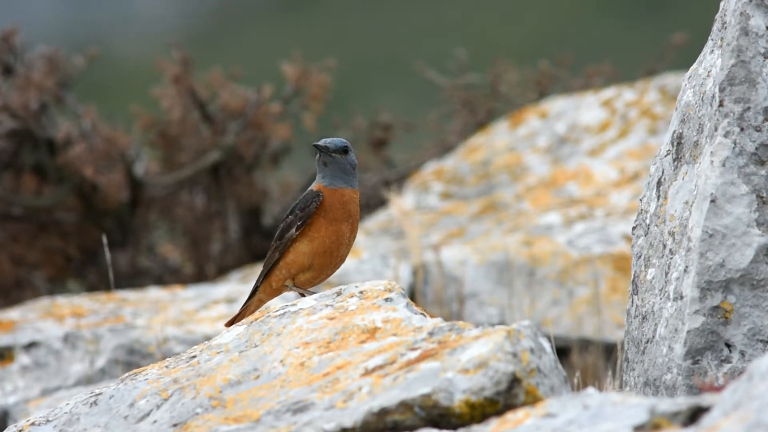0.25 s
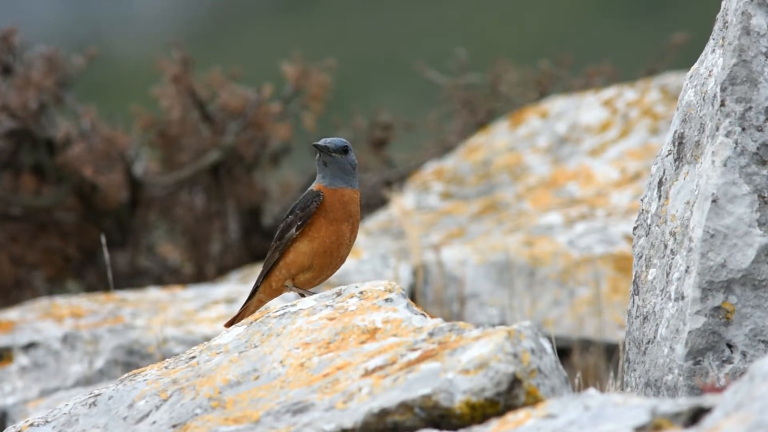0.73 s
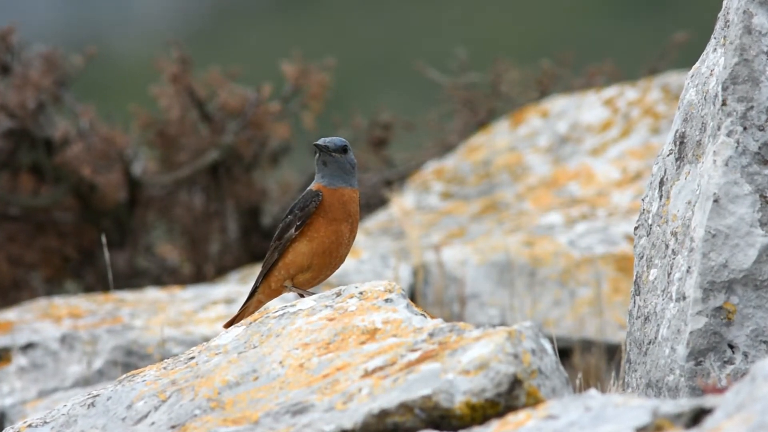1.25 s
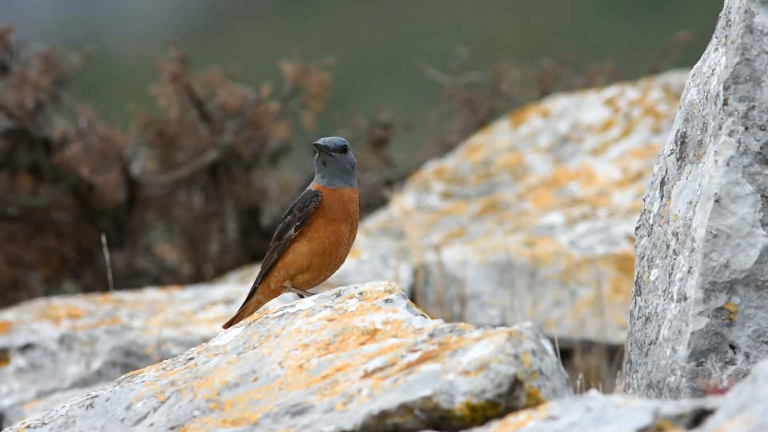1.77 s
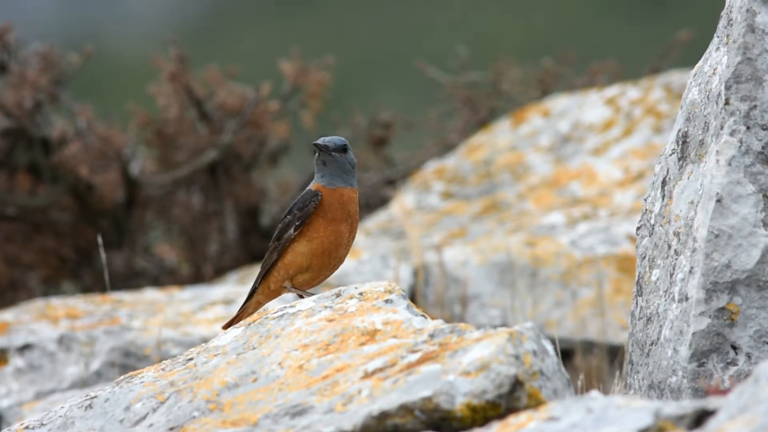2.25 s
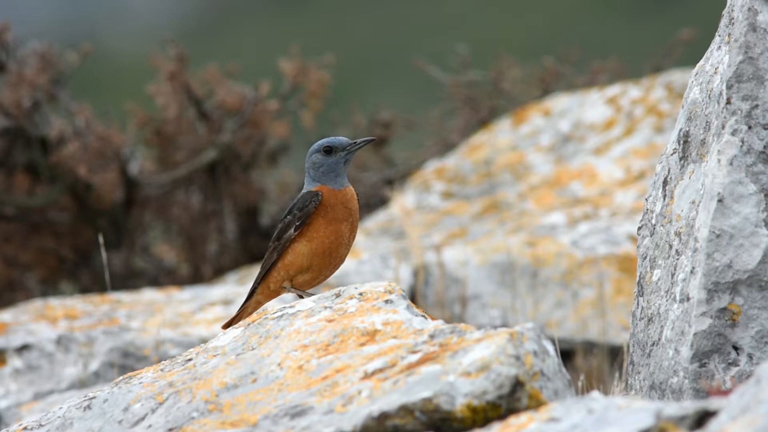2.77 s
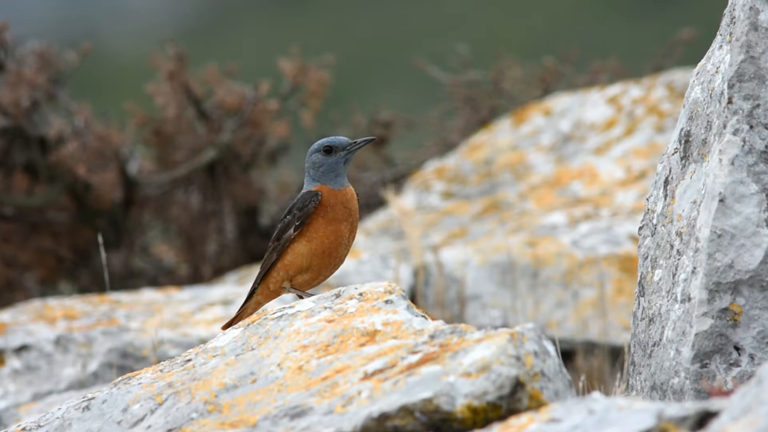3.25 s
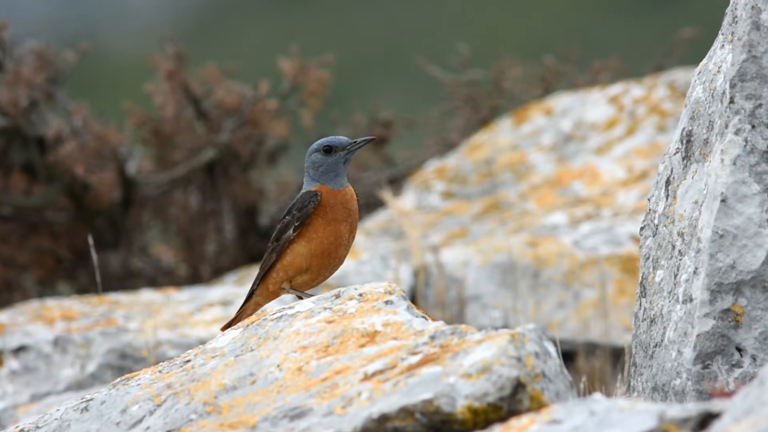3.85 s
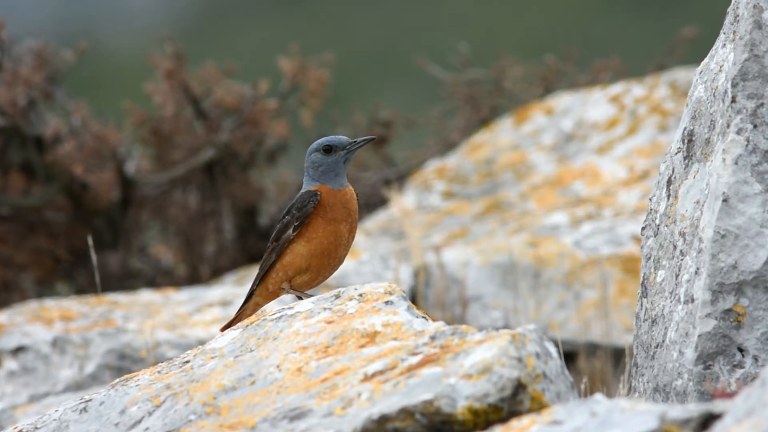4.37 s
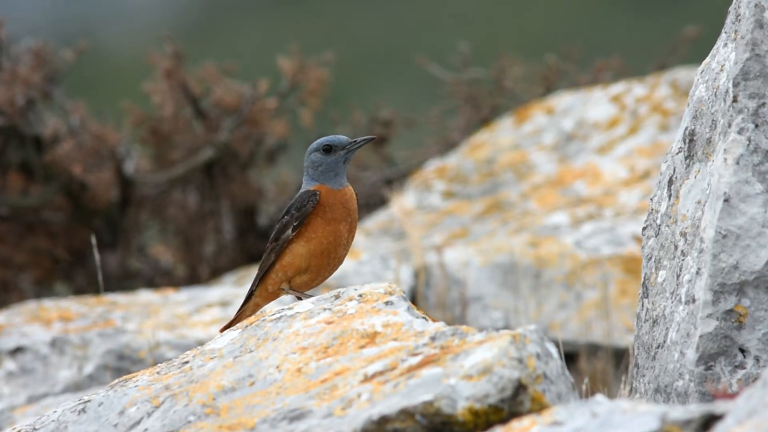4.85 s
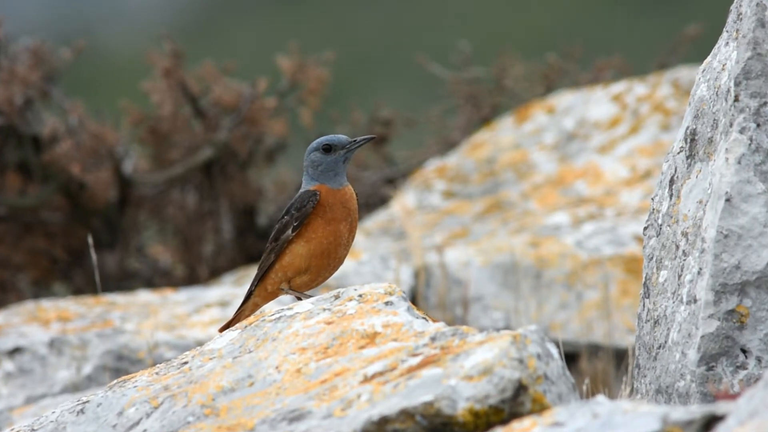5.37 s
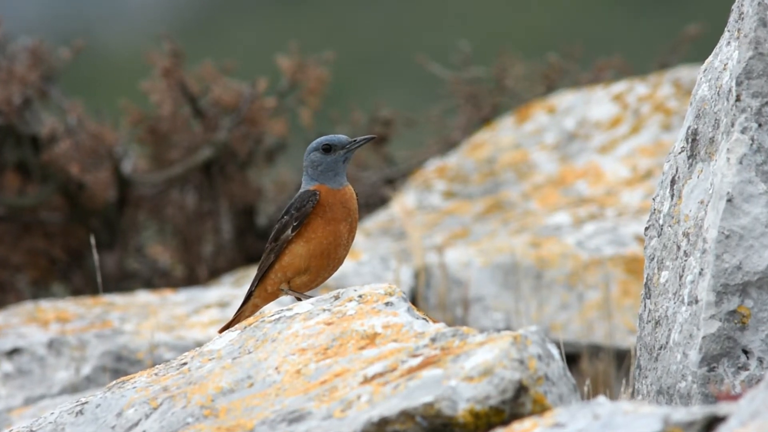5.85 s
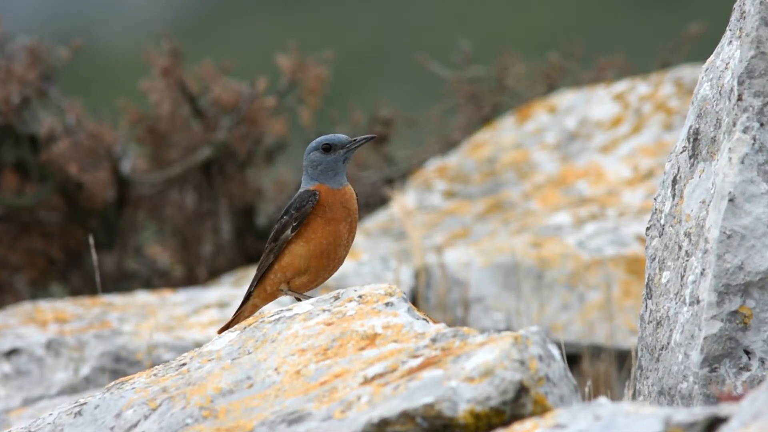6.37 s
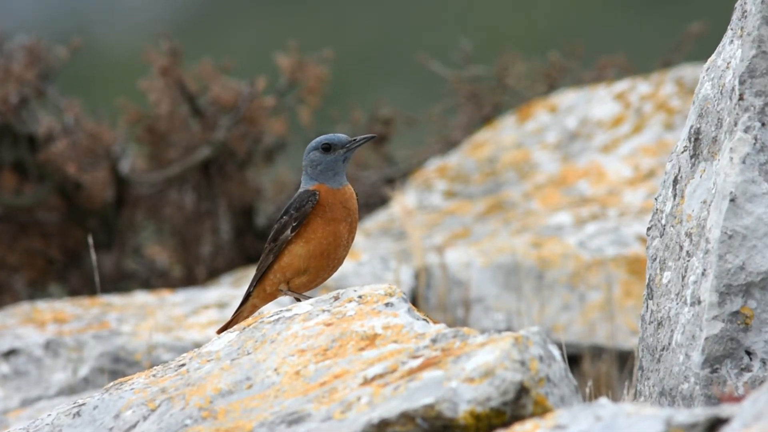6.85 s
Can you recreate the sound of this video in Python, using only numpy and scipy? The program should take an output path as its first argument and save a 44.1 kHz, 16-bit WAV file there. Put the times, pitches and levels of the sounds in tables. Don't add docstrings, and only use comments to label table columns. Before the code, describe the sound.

Outdoors on a rocky slope, low far traffic rumble and soft breezy hiss run throughout, with a faint cricket early on. After about a second and a half a rock thrush begins softly, then pours out clear whistles, purrs, rattles and high shakes, ending on a pulsing note. Nearby stone adds short, tight echoes. The handheld stereo microphone picks up small ticks and dull thuds, then only background remains.

```python
import sys
import numpy as np
from scipy import signal
from scipy.io import wavfile
from scipy.ndimage import uniform_filter1d

SR = 44100
rng = np.random.default_rng(int(sys.argv[2]) if len(sys.argv) > 2 else 0)


def gain_from_decibels(decibels):
    exponent = np.asarray(decibels, float) / 20
    return 10 ** exponent


def waveform_to_disk(signal):
    frames = np.transpose(np.atleast_2d(signal))
    scaled = np.clip(frames, -1, 1) * 32767
    samples = np.round(scaled).astype(np.int16)
    wavfile.write(sys.argv[1], SR, samples)


N = 313900


def at_hz(points, hz):
    point_hz, level_db = np.transpose(points)
    return np.interp(np.log(hz), np.log(point_hz), level_db)


def in_time(rows, t):
    s, *columns = np.transpose(rows)
    return [np.interp(t, s, c) for c in columns]


def curved(rows, t):
    s, hz = np.transpose(rows)[:2]
    rise = np.diff(hz) / np.diff(s)
    before, after = np.r_[rise[0], rise], np.r_[rise, rise[-1]]
    slope = np.where(before * after > 0, 2 * before * after / (before + after + 1e-9), 0)
    k = np.clip(np.searchsorted(s, t) - 1, 0, len(s) - 2)
    span = s[k + 1] - s[k]
    u = np.clip((t - s[k]) / span, 0, 1)
    step = (hz[k + 1] - hz[k]) * u * u * (3 - 2 * u)
    bend = span * u * (1 - u) * ((1 - u) * slope[k] - u * slope[k + 1])
    return hz[k] + step + bend


def rms_one(x):
    return x / np.sqrt(np.mean(x ** 2) + 1e-20)


def resonance(x, hz, width_hz):
    r = np.exp(-np.pi * width_hz / SR)
    poles = [1, -2 * r * np.cos(2 * np.pi * hz / SR), r * r]
    return signal.lfilter([(1 - r * r) / 2, 0, (r * r - 1) / 2], poles, x + 1e-18)


def drift(rate):
    r = np.exp(-80 * np.pi * rate / SR)
    white = rng.standard_normal(N // 40 + 2002)
    slow = signal.lfilter([1], [1, -2 * r, r * r], white)[2000:]
    return np.interp(np.arange(N) / 40, np.arange(len(slow)), rms_one(slow))


def swells(rows):
    t = np.arange(N) / SR
    return sum(gain_from_decibels(level_db) * np.exp(-((t - s) / half) ** 2) for s, half, level_db in rows)


def add(out, piece, s):
    i = round(s * SR)
    out[i:i + len(piece)] += piece


# frequency in Hz, likeness from 0 to 1.
LIKENESS = [(95, 1.0), (150, 0.9992), (290, 1), (640, 0.83), (1410, 0.18), (3100, 0.1), (6820, 0.04),
            (15000, 0.015)]


def banded_noise(spectrum, patchy_db):
    lowest, highest = spectrum[0][0], spectrum[-1][0]
    edges = lowest * 2 ** np.arange(0, np.log2(highest / lowest) + .3, 1 / 3)
    white = rng.standard_normal((2, 2, N))
    out = 0
    for k, (low, high) in enumerate(zip(edges, edges[1:])):
        band = signal.butter(2, [low, high], "band", fs=SR, output="sos")
        mid, side = signal.sosfilt(band, white[k % 2])
        hz = np.sqrt(low * high)
        alike = np.clip(at_hz(LIKENESS, hz), 0, 1 - 2.5e-5)
        gain = gain_from_decibels(at_hz(spectrum, hz) + patchy_db * drift(5.6))
        out = out + gain * (np.sqrt(1 + alike) * mid + np.sqrt(1 - alike) * side * [[1], [-1]])
    return rms_one(out)


# time in seconds, level in dB.
TRAFFIC = [(0, -46), (.8, -48), (3.1, -47.5), (4.2, -46), (5.5, -46.5), (6.2, -45), (7.12, -45.5)]
# frequency in Hz, density in dB per Hz.
RUMBLE = [(20, -14.5), (57, -2), (75, 1.5), (118, -8), (189, -14.5), (270, -22), (600, -27.5), (780, -60)]


def traffic():
    level_db = in_time(TRAFFIC, np.arange(N) / SR)[0] + 0.73 * drift(6.7)
    return gain_from_decibels(level_db + 0.54) * banded_noise(RUMBLE, patchy_db=1.5)


# middle in seconds, half length in seconds, level in dB.
MOTOR = [(.2, 0.043, -63), (.7, 0.23, -47.5), (1.3, 0.28, -53.5), (2.6, 0.13, -65), (3.65, 0.11, -48.5),
         (4.55, 0.39, -53), (5.25, 0.14, -47.5), (6.05, 0.028, -52), (6.6, 0.082, -57)]


def motor():
    start_hz, rise_hz_per_s, drone_db = 187.7, 2.2, -61.5
    hz = start_hz + rise_hz_per_s * np.arange(N) / SR + 3 * drift(1.71)
    gain = gain_from_decibels(-4.0) * (gain_from_decibels(drone_db) + swells(MOTOR))
    return gain * np.sin(2 * np.pi * np.cumsum(hz) / SR)


# frequency in Hz, width in Hz, level in dB.
WHINES = [
    (1108, 24, -71),
    (1372, 82, -65.5),
    (1631, 27, -71.5),
]


def whines():
    common, own = rng.standard_normal(N), rng.standard_normal((2, N))
    noise = common + 0.31 * own
    return sum(gain_from_decibels(level_db) * rms_one(resonance(noise, hz, width_hz)) for hz, width_hz, level_db in WHINES)


# time in seconds, level in dB.
HISS_DB = [(0, -56.5), (2, -55), (5, -54.5), (7.12, -55.5)]
# frequency in Hz, density in dB per Hz.
HISS = [(240, -30), (400, -10), (900, -3.5), (1250, -4.5), (1700, -4), (5510, -8.5), (11300, -15.5),
        (16500, -21)]


def hiss():
    return gain_from_decibels(in_time(HISS_DB, np.arange(N) / SR)[0]) * banded_noise(HISS, patchy_db=1.0)


# time in seconds, level in dB.
CRICKET = [(0, -65), (1.85, -71), (2.1, -67), (3.5, -76), (7.12, -90)]


def cricket():
    pitch_hz, first_s, every_s = 5440, 0.076, 0.13
    t = np.arange(N) / SR
    beat = ((t - first_s) / every_s + .5) % 1 - .5
    rough = rms_one(resonance(rng.standard_normal((2, N)), pitch_hz, 60))
    tone = np.sin(2 * np.pi * pitch_hz * t) + 0.69 * rough
    level = gain_from_decibels(in_time(CRICKET, t)[0] + 1.3 * drift(4.2))
    return level * np.exp(-(beat / .17) ** 2) * tone


# time in seconds, level in dB.
KNOCKS = [
    (.235, -39.5),
    (1.517, -34.5),
    (2.024, -41),
    (4.39, -36),
]
# start in seconds, peak in dB, brightness in dB, length in seconds.
TICKS = [(3.154, -31.5, -4, 0.0056), (3.162, -38.5, -8, 0.011), (3.178, -42, -6, 0.0061),
         (3.189, -33, -15, 0.014), (3.198, -35, -5, 0.0064), (3.207, -42, -2, 0.0059),
         (3.226, -29, -17, 0.0066), (3.232, -37, -0.5, 0.008), (3.25, -43, -8, 0.01),
         (3.264, -39, -10, 0.006), (3.266, -45, 4, 0.0099), (3.29, -50, -6, 0.008)]
# frequency in Hz, width in Hz, level in dB.
CASING = [(423, 160, -13.5), (596, 67, -4.5), (720, 87, 1), (1034, 58, 6.5), (1200, 144, 1),
          (1720, 145, 3.5), (3000, 870, -7.5)]


def ticks():
    rasp, bright = np.zeros((2, N))
    t = np.arange(round(.04 * SR)) / SR
    for (s, level_db, bright_db, length), noise in zip(TICKS, rng.standard_normal((len(TICKS), len(t)))):
        burst = gain_from_decibels(level_db) * noise * t / length * np.exp(1 - 2 * t / length)
        add(rasp, burst, s - .002)
        add(bright, gain_from_decibels(bright_db) * burst, s - .002)
    for s, level_db in KNOCKS:
        add(rasp, .4 * gain_from_decibels(level_db) * np.hanning(20), s - .003)
        add(rasp, .7 * gain_from_decibels(level_db) * np.hanning(26), s + .002)
    rung = 0
    for k, (hz, width_hz, level_db) in enumerate(CASING):
        rung = rung + (-1) ** k * gain_from_decibels(level_db + 12.5) * resonance(rasp, hz, width_hz)
    scrape = resonance(resonance(resonance(bright, 3900, 2600), 3800, 4300), 3500, 5000)
    return (rung + scrape) * gain_from_decibels(np.array([[-.6], [.6]]))


# time in seconds, peak in dB.
THUDS = [
    (0.284, -39.5),
    (0.417, -44.5),
    (0.498, -41.5),
    (1.039, -46),
    (3.785, -38),
    (4.176, -53),
    (5.95, -47.5),
]


def thuds():
    push = np.zeros(N)
    for s, level_db in THUDS:
        add(push, gain_from_decibels(level_db + 16.5) * np.hanning(60), s)
    return resonance(push, hz=341, width_hz=45)


# time in seconds, cycles done.
PACE = [
    [(2.045, 0), (2.312, 62)],
    [(2.354, .22), (2.44, 3.25), (2.46, 3.9)],
    [(2.704, -.6), (2.765, 5.8), (2.85, 14.8)],
    [(4.66, 0), (4.805, 20)],
    [(5.058, -4.3), (5.122, .15), (5.164, 3.1), (5.208, 6.05), (5.24, 8.02), (5.269, 10.02), (5.31, 13.01),
     (5.39, 19.01), (5.442, 22.95)],
    [(4.09, 0), (4.32, 30)],
]
# time in seconds, pitch swing in Hz, level swing in dB, unsteadiness in Hz.
VIBRATO = [
    [(2.045, 60, 2.5, 58), (2.09, 120, -1, 80), (2.2, 100, -0.5, 80.7), (2.312, 40.3, 3.5, 40)],
    [(2.354, 264, 1.5, 10), (2.435, 160, 0, 8), (2.452, 3.8, -2.5, 5)],
    [(2.704, 180, 5, 40), (2.76, 170, 4, 25), (2.8, 80, -2.5, 42), (2.85, 30, 12.5, 15)],
    [(4.66, 30, 4, 16), (4.72, 69.5, -1.5, 19), (4.805, 60.7, 1, 15)],
    [(5.058, 18, -6, 12), (5.122, 120, 10, 23), (5.18, 160, 2.5, 16), (5.225, 120, 6, 18),
     (5.269, 100, 9.5, 25), (5.31, 63, 5, 25), (5.36, 36, 7.5, 16), (5.4, 35, 10.5, 17),
     (5.442, 50, 10, 16)],
    [(4.09, 15, 2.5, 35), (4.2, 15, 1.5, 35), (4.32, 15, 2.5, 40)],
]
# whistle pitch in Hz, octave against the whistle in dB.
OVERTONE = [(1650, -2), (2050, -21), (2300, -37), (2500, -20.5), (2700, -19), (3000, -27.5), (4300, -27.5)]
# time in seconds, change in dB.
BEAK = [
    [(.05, 1.5), (1.3, -20), (1.46, -20), (1.55, -6), (2.19, 5), (2.36, -2), (2.47, -4), (2.545, -2),
     (2.66, 2.5), (3.1, 8), (3.18, 3), (3.22, 4), (3.3, -5), (3.48, -2), (3.55, 2)],
    [(3.6, .1), (3.74, -6), (4.008, -17), (4.022, 5.5), (4.045, -7), (4.1, -4), (4.13, 3), (4.16, -9),
     (4.22, 3), (4.28, 0), (4.32, -5), (4.6, 3), (4.63, -1), (4.7, 0), (4.8, -4), (4.9, -2), (5.45, -2)],
]


def whistle(rows, glide_s=.004, fade_s=.005, shaky=.002):
    t = np.arange(rows[0][0], rows[-1][0] + fade_s, 1 / SR)
    hz = curved(rows, t)
    level_db = uniform_filter1d(in_time(rows, t)[1], max(1, round(glide_s * SR)), mode="nearest")
    tremor = rms_one(resonance(rng.standard_normal(SR // 2), 160, 250))[:len(t)]
    for pace, shake in zip(PACE, VIBRATO):
        turn = 2 * np.pi * in_time(pace, t)[0]
        swing_hz, swing_db, unsteady_hz = in_time(shake, t)
        on = (t >= shake[0][0]) & (t < shake[-1][0] + fade_s)
        wave = np.sin(turn) - 0.095 * np.cos(2 * turn)
        hz = hz - on * (swing_hz * wave + unsteady_hz * tremor)
        beat = np.cos(turn) + 0.17 * np.cos(2 * turn) - 0.12 * np.sin(2 * turn)
        level_db = level_db + on * swing_db * beat
    phase = 2 * np.pi * np.cumsum(hz * (1 + shaky * tremor)) / SR
    edge = np.clip(np.minimum(t - t[0], t[-1] - t) / fade_s, 0, 1)
    usual_db, octave_lag, flicker_db = -42.5, 0.63, 4
    effort_db = octave_lag * np.maximum(level_db - usual_db, 0)
    beak_db = in_time(BEAK[0] + BEAK[1], t)[0]
    octave = gain_from_decibels(at_hz(OVERTONE, hz) - effort_db + beak_db + flicker_db * (tremor - 0.85))
    return np.sqrt(2) * gain_from_decibels(level_db) * edge ** 2 * (np.sin(phase) + octave * np.sin(2 * phase))


# time in seconds, pitch in Hz, level in dB.
LEAD_IN = [
    [(1.352, 1720, -52), (1.366, 1800, -57), (1.383, 1990, -50), (1.398, 2040, -58)],
    [(1.408, 2630, -37), (1.416, 2070, -49), (1.426, 1890, -52), (1.441, 1720, -52)],
    [(1.549, 2970, -53), (1.562, 2750, -50), (1.574, 2680, -42.5), (1.586, 2592, -32.5), (1.595, 2570, -47),
     (1.601, 2450, -53)],
    [(1.609, 2960, -50), (1.616, 2700, -43), (1.622, 2460, -31), (1.628, 2330, -33.5), (1.636, 2175, -36),
     (1.643, 2060, -40)],
]
# time in seconds, pitch in Hz, level in dB.
OPENING = [
    [(2.006, 2430, -36), (2.025, 2520, -43), (2.033, 2640, -32.5), (2.046, 2800, -31.5),
     (2.055, 2960, -38.5), (2.085, 3130, -39), (2.112, 2880, -47), (2.123, 2644, -31.5), (2.133, 2310, -44)],
    [(2.136, 2450, -38), (2.157, 2640, -37), (2.168, 2710, -48)],
    [(2.142, 3700, -27), (2.155, 3190, -40), (2.19, 3050, -39.5), (2.215, 2564, -42.5), (2.228, 2750, -41)],
    [(2.228, 3890, -39.5), (2.25, 3314, -37), (2.28, 3200, -33), (2.312, 3176, -51)],
    [(2.354, 2644, -35), (2.385, 2665, -28.5), (2.415, 2660, -30.5), (2.44, 2633, -24.5),
     (2.455, 2834, -28.5), (2.472, 2815, -29.5), (2.482, 2856, -29.5), (2.5, 2856, -33.5),
     (2.506, 2660, -37)],
    [(2.54, 2340, -36), (2.558, 2934, -40.5), (2.568, 2750, -28.5), (2.576, 2494, -20.5),
     (2.585, 2195, -30.5), (2.605, 1720, -50), (2.635, 1986, -38.5), (2.665, 2030, -53)],
    [(2.704, 3640, -44.5), (2.73, 4085, -33.5), (2.755, 4260, -33), (2.79, 3896, -31.5),
     (2.825, 3284, -38.5), (2.85, 3210, -60)],
]
# time in seconds, pitch in Hz, level in dB.
MIDDLE = [
    [(3.17, 2750, -49), (3.19, 2700, -36.5), (3.197, 2563, -29.5), (3.205, 2400, -26.5), (3.213, 2510, -27),
     (3.222, 2560, -32.5), (3.232, 2440, -48), (3.24, 2340, -64)],
    [(3.492, 2120, -48), (3.51, 2660, -38), (3.535, 2980, -45), (3.553, 2950, -41), (3.561, 2640, -30.5),
     (3.567, 2310, -37)],
    [(3.73, 2330, -46), (3.745, 2330, -39), (3.76, 2360, -30.5), (3.775, 2530, -24), (3.783, 2615, -32.5),
     (3.792, 2726, -26), (3.805, 2797, -35), (3.815, 2724, -36)],
    [(3.922, 3130, -54), (3.947, 2980, -39.5), (3.953, 2870, -34), (3.965, 2730, -34.5),
     (3.982, 2670, -28.5), (3.992, 2588, -26.5), (4.003, 2576, -32), (4.015, 2503, -32.5),
     (4.035, 2453, -32), (4.055, 2360, -35.5)],
]
# time in seconds, pitch in Hz, level in dB.
CLOSING = [
    [(4.613, 1550, -46), (4.625, 2076, -42), (4.64, 2434, -24.5), (4.65, 2650, -31), (4.66, 2800, -39.5),
     (4.69, 3295, -40.5), (4.73, 3522, -38.5), (4.77, 3456, -35.5), (4.805, 3220, -53)],
    [(5.058, 2756, -52), (5.09, 2728, -42), (5.13, 2570, -44.5), (5.18, 2510, -38), (5.23, 2550, -40.5),
     (5.28, 2576, -43), (5.36, 2540, -40.5), (5.41, 2456, -43), (5.434, 2435, -44)],
]


def free_notes():
    return LEAD_IN + OPENING + MIDDLE + CLOSING


# start in seconds, length in seconds, top in Hz, peak in dB, end under the peak in dB.
HOOKS = [
    (1.713, 0.1, 2117, -33.5, -1),
    (4.366, 0.089, 2198, -36, -4),
]
# share of length, share of top pitch, level under the peak in dB.
HOOK_SHAPE = [
    (0, .892, -23),
    (.29, 0.96, -4.5),
    (.62, 1.0, -0.5),
]


def hooks():
    return [[(s + u * length, top * share, db + under) for u, share, under in HOOK_SHAPE + [(0.97, 0.97, end_db)]]
            for s, length, top, db, end_db in HOOKS]


def trill(shape, repeats, out):
    low_hz = shape[-1][1]
    for s, change_db, reach, stretch in repeats:
        rows = [(t * stretch, low_hz + reach * (hz - low_hz), level_db) for t, hz, level_db in shape]
        syllable = gain_from_decibels(change_db) * whistle(rows, glide_s=0.0024, fade_s=0.0011, shaky=0.013)
        add(out, syllable, s - (stretch - 1) * .004)


def syllables(effort, first_s, gap_s, growth_s, longest_s, count):
    gaps = np.minimum(gap_s + growth_s * np.arange(count - 1), longest_s)
    s = first_s + np.r_[0, np.cumsum(gaps)]
    return zip(s, *in_time(effort, s))


# seconds after its start, pitch in Hz, level in dB.
PURR = [(0, 2560, -42.5), (.003, 2346, -32), (.007, 1930, -50), (.011, 1694, -52), (.017, 1668, -55)]
# time in seconds, change in dB, pitch reach, stretch in time.
PURR_EFFORT = [
    (1.829, 1, 0.71, 1.1),
    (1.875, 3.5, 0.96, 1.01),
]


def purr(out):
    trill(PURR, syllables(PURR_EFFORT, first_s=1.82, gap_s=.019, growth_s=.0002, longest_s=.02, count=6), out)


# start in seconds, length in seconds, centre in Hz, width in Hz, level in dB.
HUSK = [(1.997, 0.052, 3540, 910, -43.5), (2.095, 0.069, 3940, 1500, -49), (2.194, 0.05, 5100, 1500, -58),
        (2.36, 0.048, 4600, 910, -57), (3.609, 0.053, 3760, 1200, -46), (3.887, 0.081, 4170, 1800, -50.5),
        (4.606, 0.03, 3770, 700, -49)]


def husk(out):
    for (s, length, hz, width_hz, level_db), air in zip(HUSK, rng.standard_normal((len(HUSK), SR // 10))):
        air = rms_one(resonance(resonance(air, hz, width_hz), hz, width_hz))[:round(length * SR)]
        add(out, gain_from_decibels(level_db) * air * np.hanning(len(air)), s)


# start in seconds, length in seconds, from Hz, to Hz, level in dB.
WISPS = [(2.305, 0.014, 2880, 2670, -57), (2.693, 0.0154, 2800, 2583, -50.5),
         (4.545, 0.013, 2590, 2430, -52), (4.555, 0.018, 1720, 1537, -55.5),
         (4.556, 0.044, 3240, 3000, -54.5), (4.587, 0.015, 2570, 2490, -52), (4.738, 0.03, 4550, 4420, -58),
         (4.768, 0.018, 4300, 4100, -56), (2.127, 0.011, 4570, 4480, -49)]


def wisps():
    return [[(s, a, db), (s + length, b, db + 2)] for s, length, a, b, db in WISPS]


# seconds after its start, pitch in Hz, level in dB.
RATTLE = [(0, 2700, -42), (.002, 2700, -35), (.0045, 2470, -32), (.007, 2150, -37), (.011, 1670, -55)]
# time in seconds, change in dB, pitch reach, stretch in time.
RATTLE_EFFORT = [(2.909, -18, 0.87, 1.2), (2.918, -2, 0.89, 0.92), (2.945, 1, 0.76, 0.97),
                 (2.962, 2, 0.79, 0.87), (2.98, -0.5, 0.89, 0.93), (3.0, 3, 0.7, 1.04),
                 (3.035, 0, 0.93, 1.25), (3.054, 0, 0.93, 1.32), (3.073, -2.5, 0.9, 1.24)]


def rattle(out):
    trill(RATTLE, syllables(RATTLE_EFFORT, first_s=2.909, gap_s=.008, growth_s=.0032, longest_s=.0188, count=11), out)


# start in seconds, half turn in seconds, low in Hz, high in Hz, level in dB.
WARBLES = [
    (3.298, .0116, 1976, 2186, -39.5),
]


def warbles():
    count = 12
    top_db, edge_db, hold_db = 7.3, -6.5, -25
    top_creep_hz, low_creep_hz = 9.7, -2
    k = np.arange(count + 1)
    side = -(-1.) ** k
    middle = np.abs(np.sin(np.pi * k / count))
    notes = []
    for s, half, low, high, db in WARBLES:
        creep_hz = np.where(side > 0, top_creep_hz, low_creep_hz) * k * (k < count - 1)
        hz = np.where(side > 0, high, low) + creep_hz
        turn_s = s + half * k - .0001 * np.where(side < 0, 1, .6) * middle ** 2
        turns = np.transpose([turn_s, hz, db + top_db * side + edge_db * (1 - middle) ** 2])
        rises = (turns[:-1:2] + turns[1::2]) / 2 + [0, 3, 5.5]
        notes.append(np.insert(turns, k[1::2], rises, axis=0))
        turns[:, 2] += -1.5 * (1 - middle)
        for turn in turns[2:-1:2]:
            notes.append([turn + [-half / 4, 0, hold_db - 3],
                          turn + [half * 0.24, 0, hold_db + 1.5],
                          turn + [half * .55, 0, hold_db + 2]])
    return notes


# seconds after its start, pitch in Hz, level in dB.
BUZZ = [(0, 4250, -46), (.002, 4230, -34.5), (.005, 3170, -39.5), (.008, 2550, -33)]
# time in seconds, change in dB, pitch reach, stretch in time.
BUZZ_EFFORT = [
    (3.613, -12, 0.96, 1.1),
    (3.636, 2, 1.05, 1.2),
    (3.668, -6.5, 0.2, 1.01),
]


def buzz(out):
    trill(BUZZ, syllables(BUZZ_EFFORT, first_s=3.613, gap_s=.0122, growth_s=.0008, longest_s=.015, count=5), out)


# start in seconds, length in seconds, top in Hz, end in Hz, peak in dB.
DIPS = [
    (3.872, 0.0268, 3944, 3510, -27.5),
    (3.91, 0.032, 3796, 3600, -30.5),
]


def dips():
    return [[(s, top - 95, db - 17), (s + 0.47 * length, top, db), (s + length, end, db - 18)]
            for s, length, top, end, db in DIPS]


# start, climb and stay on top in seconds, top in Hz, level in dB.
ARCHES = [
    (4.092, 0.022, 0.0047, 4104, -40),
    (4.139, .018, 0.0041, 3950, -38.5),
    (4.183, 0.012, 0.011, 3770, -38.5),
    (4.229, .01, 0.013, 3720, -37.5),
    (4.276, .01, .005, 4030, -41),
]
# fall in seconds, end in Hz, change at its end in dB.
ARCH_FALLS = [
    (0.015, 2610, 3),
    (0.012, 2800, 5),
    (0.0098, 2510, 4),
    (.01, 2490, 5),
    (0.02, 2480, -13),
]


def arches():
    foot_hz, sag_hz = 2750, 60
    notes = []
    for (s, climb, stay, top, db), (fall, end, end_db) in zip(ARCHES, ARCH_FALLS):
        leave = s + climb + stay
        notes.append([(s, foot_hz, db - 11), (s + climb / 2, (foot_hz + top) / 2, db - 3.5),
                      (s + climb, top, db), (leave, top - sag_hz, db),
                      (leave + fall / 2, (top + end) / 2, db - 0.5), (leave + fall, end, db + end_db)])
    return notes


# start in seconds, length in seconds, from Hz, to Hz, level in dB.
HOLDS = [
    (4.103, .013, 2640, 2640, -48),
    (4.133, 0.018, 2640, 2790, -36.5),
    (4.172, 0.018, 2556, 2726, -33.5),
    (4.214, .026, 2500, 2670, -36.5),
    (4.266, .016, 2520, 2380, -41),
    (4.269, .022, 2720, 2680, -45),
]


def holds():
    return [[(s, a, db - 2.5), (s + 0.59 * length, (a + b) / 2, db), (s + length, b, db - 13)]
            for s, length, a, b, db in HOLDS]


# start in seconds, length in seconds, from Hz, to Hz, level in dB.
CLIMBS = [
    (4.853, 0.033, 2660, 3130, -48),
    (4.898, 0.025, 2354, 3114, -41),
    (4.953, 0.026, 2550, 3180, -42.5),
]


def climbs():
    return [[(s, a, db + 1.5), (s + length / 2, (a + b) / 2, db), (s + length, b, db + 1.5)]
            for s, length, a, b, db in CLIMBS]


# seconds after its start, pitch in Hz, level in dB.
FLICK = [
    (0, 3280, -33.5),
    (.004, 2535, -28.5),
    (.009, 2200, -42),
]
# start in seconds, change in dB, pitch reach, stretch in time.
FLICKS = [
    (4.88, -5.5, 0.72, 1.01),
    (4.923, -2.5, 0.84, 1.01),
    (4.936, -6.5, 0.84, 1.01),
    (4.976, -5, 0.96, 1.01),
    (4.987, -4, 0.95, 1.01),
]


def flicks(out):
    trill(FLICK, FLICKS, out)


def thrush():
    out = np.zeros(N)
    notes = free_notes() + hooks() + wisps() + warbles() + dips() + arches() + holds() + climbs()
    for rows in notes:
        add(out, whistle(rows), rows[0][0])
    for part in (purr, rattle, buzz, flicks, husk):
        part(out)
    return out


ECHO_MS = [1.91, 2.46, 4.39, 5.24, 5.73, 6.81, 7.29, 7.95, 8.32, 10.0, 13.6]
ECHO_STRENGTHS = [0.12, 0.19, -0.2, -0.13, 0.21, 0.023, 0.18, 0.23, -0.14, 0.079, 0.19]
# frequency in Hz, width in Hz, level in dB.
HOLLOW = [
    (2640, 48.4, 7),
    (2800, 51, 1.5),
]


def rocks(x):
    taps = np.zeros(round(.02 * SR))
    taps[0] = 1
    for delay_ms, strength in zip(ECHO_MS, ECHO_STRENGTHS):
        taps += strength * np.sinc(np.arange(len(taps)) - delay_ms / 1000 * SR)
    echoed = signal.oaconvolve(x, taps)[:N]
    near = echoed + sum(gain_from_decibels(level_db) * resonance(x, hz, width_hz) for hz, width_hz, level_db in HOLLOW)
    scatter_db, t60_s = -9, .12
    t = np.arange(round(.2 * SR)) / SR
    tails = rng.standard_normal((2, len(t))) * gain_from_decibels(-60 * t / t60_s) * np.clip(t / 0.00034, 0, 1)
    tails = gain_from_decibels(scatter_db) * tails / np.sqrt(np.sum(tails ** 2, axis=1, keepdims=True))
    lean = .12 * resonance(near, 4030, 1200) * [[-1], [1]]
    return near * gain_from_decibels(np.array([[.3], [-.3]])) + lean + signal.oaconvolve(x[None], tails, axes=1)[:, :N]


# middle in seconds, half length in seconds, level in dB.
GUSTS = [
    (1.72, 0.07, -62),
    (2.85, .04, -65),
    (5.902, 0.1, -66),
]


def gusts():
    return swells(GUSTS) * rms_one(resonance(rng.standard_normal((2, N)), 8000, 6000))


def scene():
    song = rocks(thrush())
    gear = ticks() + thuds()
    far = traffic() + motor() + whines()
    return song + gear + cricket() + gusts() + far + hiss()


def roll_off(x):
    return signal.sosfilt(signal.butter(12, 15900, fs=SR, output="sos"), x)


def record(dry):
    top_cut = signal.cheby2(10, 50, 15960, fs=SR, output="sos")
    mix = signal.sosfilt(top_cut, dry)
    return roll_off(mix)


dry = scene()
out = record(dry)
waveform_to_disk(out)
```